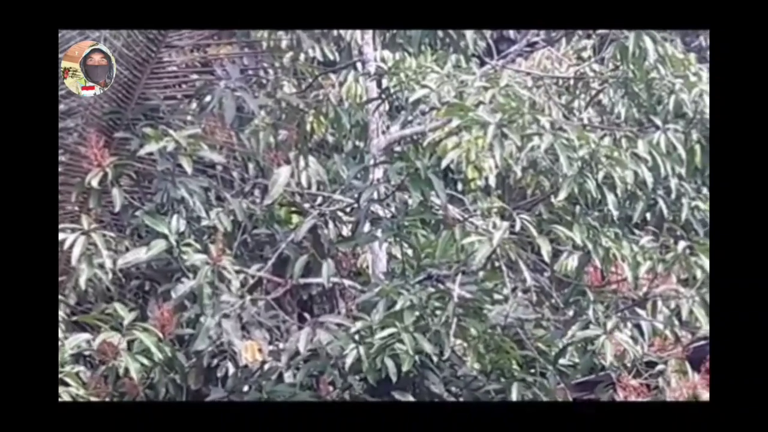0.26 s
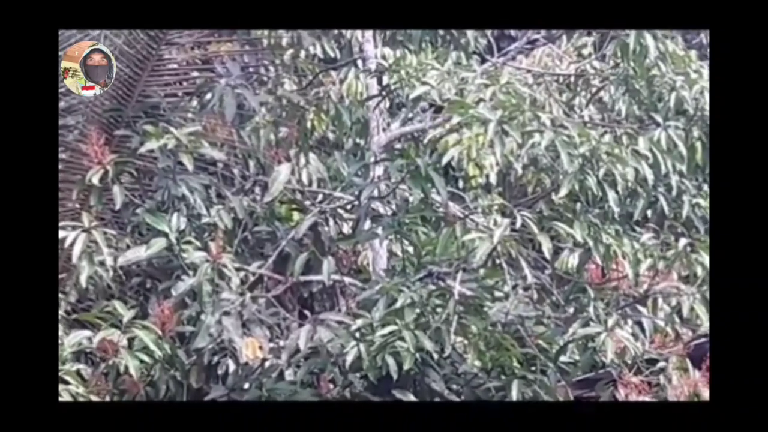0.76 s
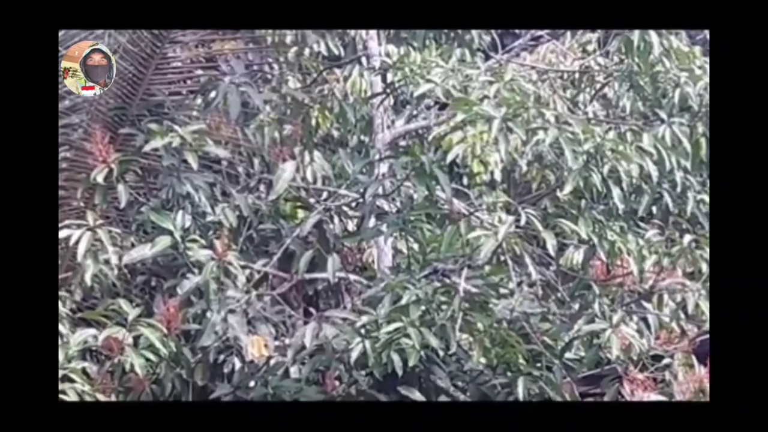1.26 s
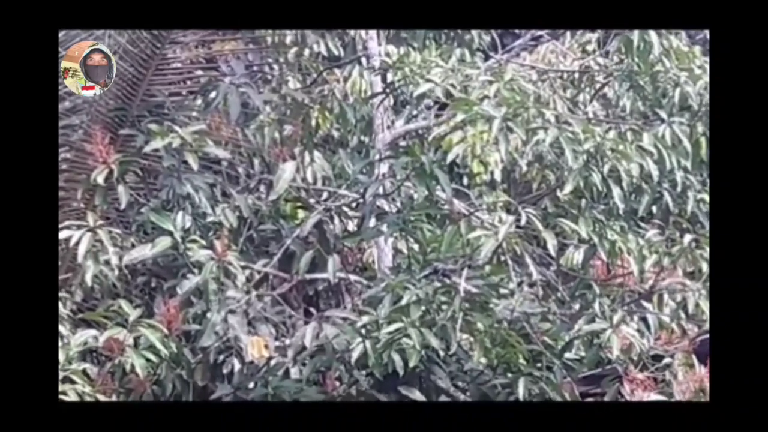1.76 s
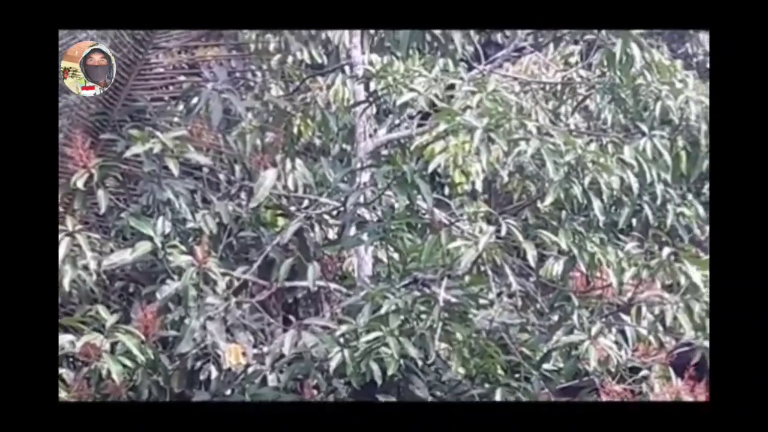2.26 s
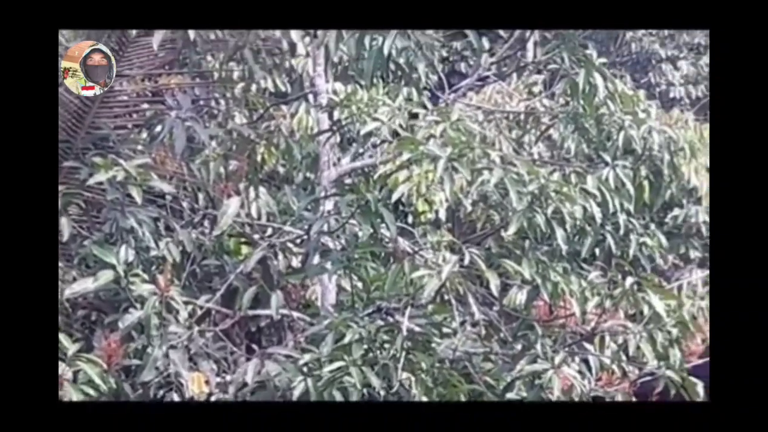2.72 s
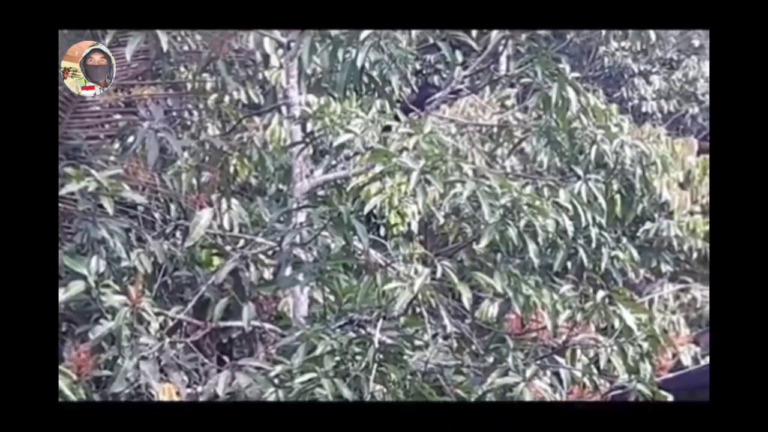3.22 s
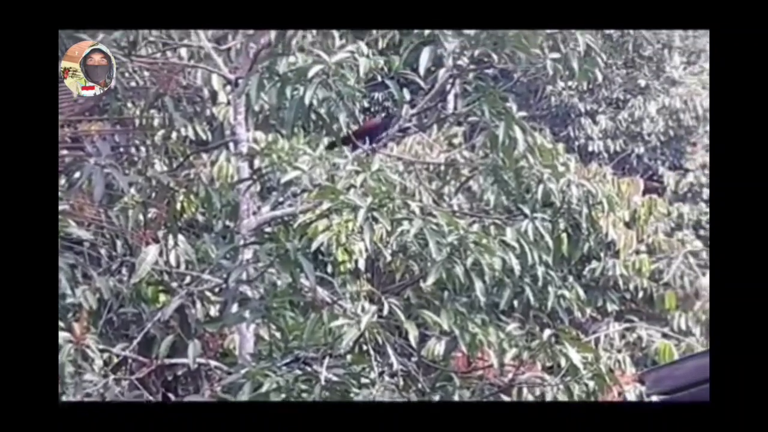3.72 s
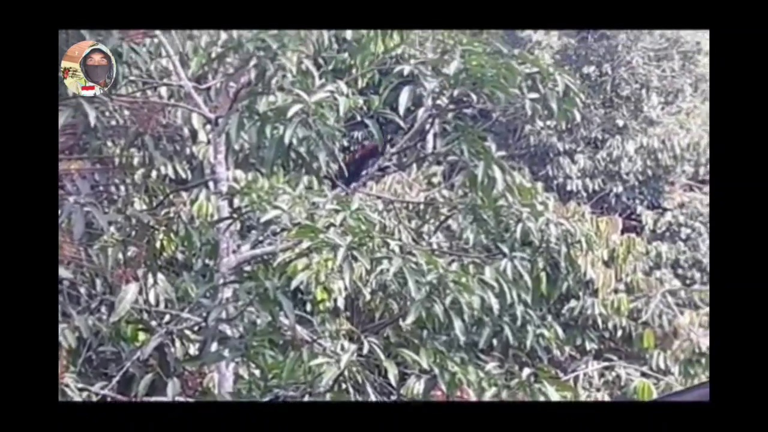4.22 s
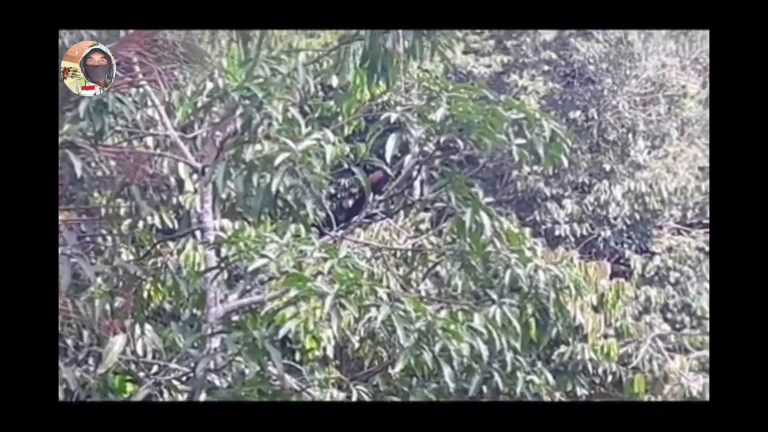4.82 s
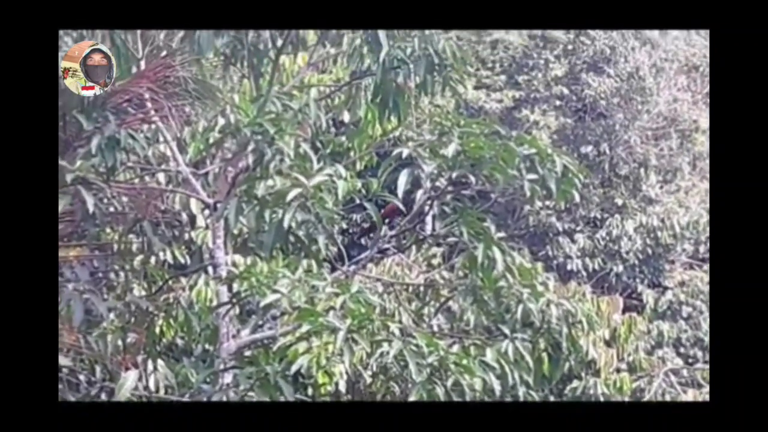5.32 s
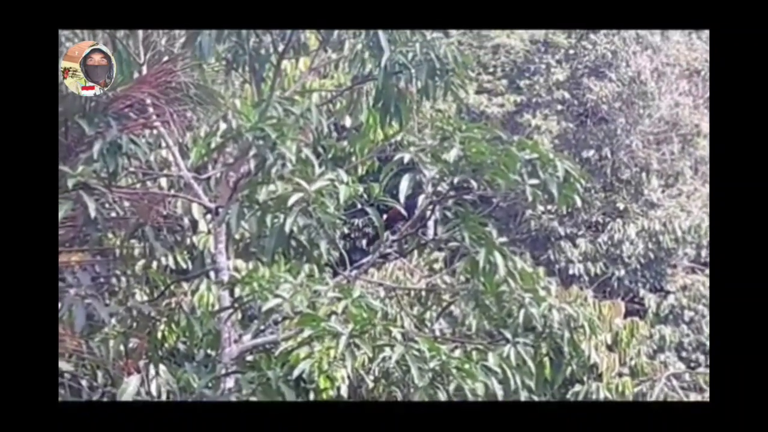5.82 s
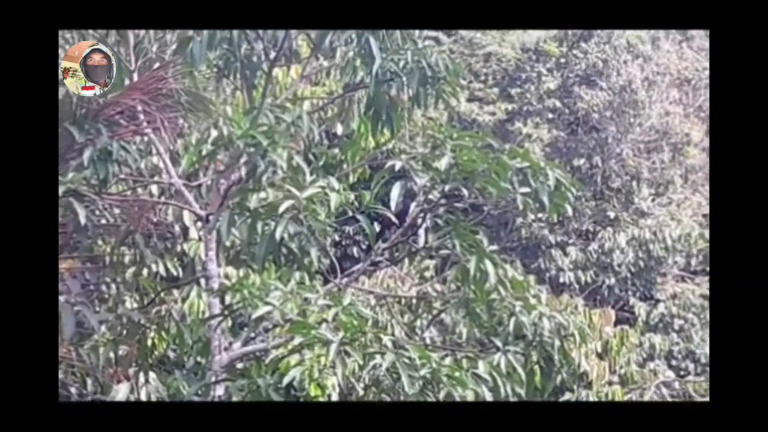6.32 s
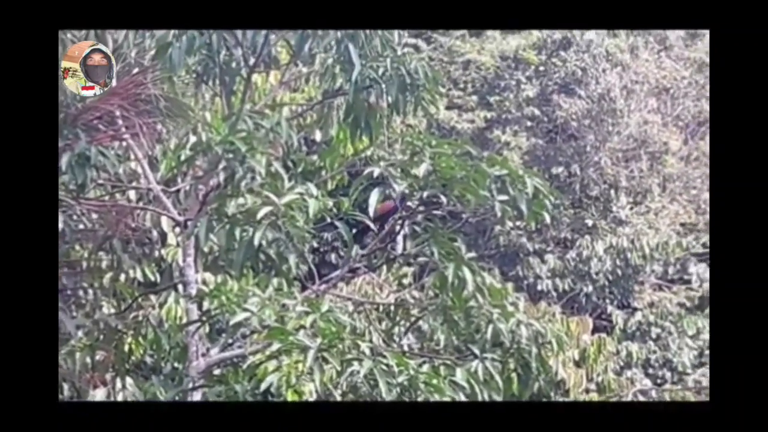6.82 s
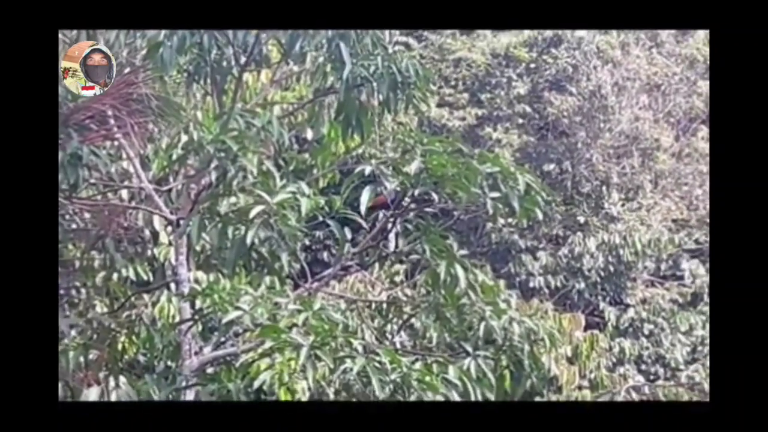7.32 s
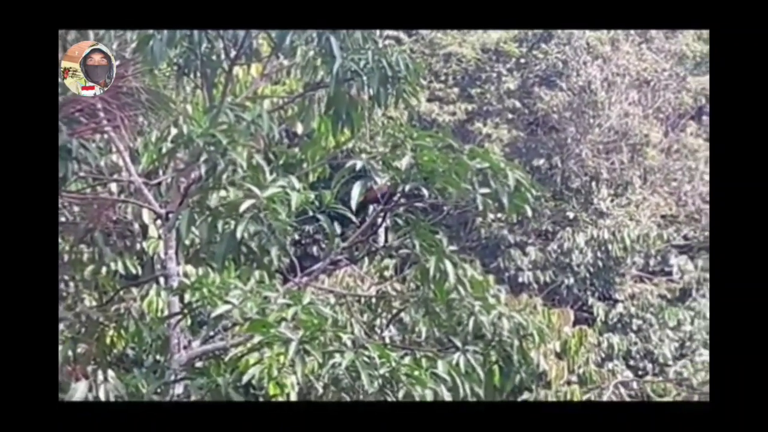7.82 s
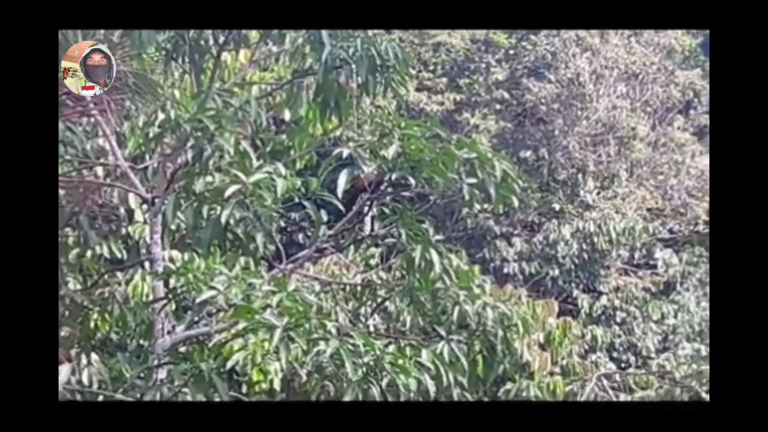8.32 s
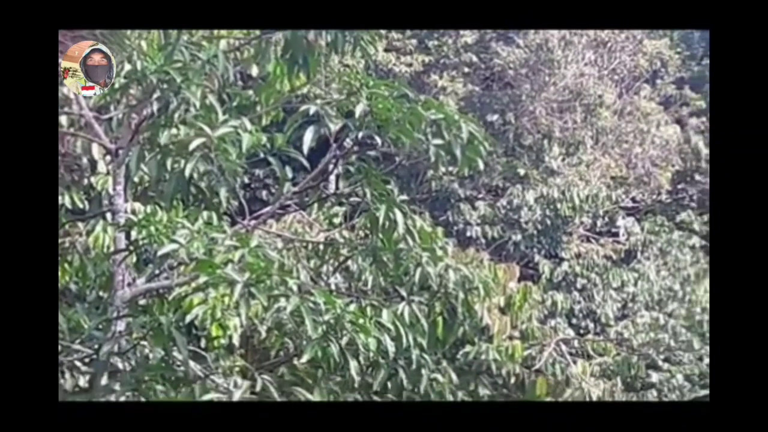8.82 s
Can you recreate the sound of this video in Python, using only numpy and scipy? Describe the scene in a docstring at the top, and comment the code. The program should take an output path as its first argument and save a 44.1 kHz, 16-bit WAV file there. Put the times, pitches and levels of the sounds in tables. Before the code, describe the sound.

A steady high insect trill among trees, with occasional falling bird chirps, soft far birdsong, a light breeze, a click and a thump.

```python
"""Insects and birds in a wooded yard

Insects rub their wings in a steady trill near 7.7 kHz while a bird gives four falling chirps.
Farther birds purr, twitter, rasp and whistle, their calls scattered by the foliage, over the hum
of a distant motor and the eddies of a light breeze. A hand bumps the microphone ports,
hardest on the left, and makes one tick by the right one."""
import sys
import numpy as np
from scipy import signal
from scipy.fft import rfft, irfft, next_fast_len
from scipy.io import wavfile
from scipy.ndimage import uniform_filter1d

SR = 44100
rng = np.random.default_rng(int(sys.argv[2]) if len(sys.argv) > 2 else 0)


def put_to_file(sound):
    """Save the sound as 16-bit audio at rate SR, in the file named by the first command-line argument."""
    columns = np.atleast_2d(sound).T  # one column per channel
    safe = np.clip(columns, -1, 1)
    whole_steps = np.round(safe * 32767)
    wavfile.write(sys.argv[1], SR, whole_steps.astype(np.int16))


N = 399546

# resonance of the insects' wings: (frequency [Hz], gain [dB])
WING_RESONANCE = [(6200, -31), (6750, -20.5), (7100, -8), (7450, -1), (7750, 1), (8050, 0.5), (8400, -7),
                  (8800, -20.5), (9600, -31)]
# falling chirps: (start [s], dive length [s], held ending [s], lead-in pitch [Hz], crest pitch [Hz],
# end pitch [Hz], relative level [dB], accent on the ending [dB])
FALLING_CHIRPS = [(1.326, 0.072, .03, 6700, 4850, 3380, -40.5, -5),
                  (2.586, 0.076, .012, 5600, 4250, 3450, -45, 1),
                  (6.349, 0.074, .07, 6400, 4800, 3270, -42.3, -1.5),
                  (8.052, 0.079, .008, 6700, 4550, 3325, -46, 6)]
# contour of a dive: (time [share of its length], height [0 = end pitch, 1 = crest], gain [dB])
DIVE_CONTOUR = [(0, .5, -12), (.18, .72, -3), (.36, 1, 0), (.52, .4, 0), (.66, .28, -5), (.8, .04, -1),
                (1, 0, -3)]
# purring phrases: (start [s], length [s], pitch [Hz], relative level [dB], scatter [share of pitch])
PURR_PHRASES = [(0.227, 0.28, 2168, -58.5, 0.094), (0.682, 0.2, 2060, -57, 0.101),
                (1.167, 0.18, 2160, -55, 0.12), (1.755, 0.44, 2124, -57.5, 0.061),
                (2.195, 0.19, 2013, -60.5, 0.066), (2.671, 0.48, 2135, -57.5, 0.076),
                (3.402, 0.32, 2087, -57.5, 0.062), (3.856, 0.36, 2160, -59, 0.08),
                (4.43, 0.46, 2172, -56.5, 0.049), (4.997, 0.45, 2073, -68.5, 0.097),
                (5.558, 0.41, 2074, -60, 0.0983), (6.077, 0.44, 2180, -56, 0.042),
                (6.715, 0.47, 1930, -59, .11), (7.123, 0.45, 2200, -64.5, 0.063),
                (7.821, 0.25, 2020, -59, 0.086), (8.723, 0.28, 2455, -65, 0.036)]
# the two bands of a purr: (frequency [multiple of pitch], gain [dB])
PURR_BANDS = [(1, 0), (2.13, -8)]
# breath noise around a purr: (frequency [multiple of pitch], gain [dB])
BREATH_SPECTRUM = [(.65, -19), (.82, -14), (1, 14), (1.13, -9), (1.35, -17)]
# whistled and cooed notes: (start [s], length [s], start pitch [Hz], end pitch [Hz], relative level [dB])
WHISTLED_NOTES = [(1.545, 0.023, 2410, 1750, -55), (3.613, 0.075, 389, 447, -61),
                  (6.025, 0.16, 2620, 2830, -63.5), (6.762, 0.033, 4250, 4185, -63)]
# partials of the reedy call: (frequency [Hz], relative level [dB])
REEDY_PARTIALS = [(1800, -67), (2600, -70), (3120, -60.5), (3700, -64.5), (3980, -64)]
# dry rasps: (start [s], length [s], relative level [dB])
RASP_CALLS = [(1.129, 0.014, -55), (1.583, 0.081, -61.5), (4.68, 0.034, -56.5), (4.95, 0.035, -60.5),
              (5.006, 0.059, -57), (5.108, 0.046, -55.5), (6.748, 0.053, -58), (6.834, 0.037, -55.5),
              (6.929, 0.041, -57.5)]
# thin twitter of the farthest birds: (start [s], length [s], pitch [Hz], relative level [dB])
TWITTER_PHRASES = [(0.049, 1.7, 3095, -69.5), (0.248, 0.58, 4570, -65.5), (0.303, 1.3, 5000, -67),
                   (2.301, 0.54, 4930, -65), (2.858, 0.22, 4940, -63), (4.097, 0.4, 5060, -67.5),
                   (4.15, .6, 4560, -68), (5.402, 0.42, 5020, -68), (5.648, 0.96, 4590, -66),
                   (5.62, 0.42, 3070, -69), (8.704, 0.61, 4850, -66)]
# purring birds too far off to tell apart: (frequency [Hz], gain [dB])
FAR_PURR_SPECTRUM = [(1500, -9), (1850, -12.5), (2150, 4), (2400, -11), (2750, -31)]
# bumps on the ports: (time [s], peak before capping [dB], pitch [factor], left minus right [dB])
PORT_BUMPS = [(3.949, -34.5, 0.44, -18), (4.1607, -36.5, 0.48, -21), (8.4345, 1, 0.91, 60),
              (8.914, -23, 0.44, 40), (8.9413, -31, 0.68, 42)]
# spectrum of a bump at pitch factor 1: (frequency [Hz], gain [dB])
BUMP_SPECTRUM = [(30, -78), (85, -17.5), (160, -3.5), (240, 1), (400, 1), (680, -4), (1000, -6),
                 (1900, -20), (2800, -28.5), (5000, -54), (9000, -68)]
# tick by the right port: (level [dB], ring frequency [Hz], damping [1/s])
PORT_TICK = (-9.5, 10800, 16000)
# the breeze drops, picks up once and dies away: (time [s], level [dB])
BREEZE_LEVELS = [(0, -60.5), (.6, -57.5), (1.7, -67), (3.4, -64), (3.9, -59), (5.0, -61), (5.8, -64),
                 (7.3, -74.5), (9.06, -72)]
# low buffets of wind: (start [s], length [s], level [dB], left minus right [dB])
WIND_BUFFETS = [(0.44, 0.1, -52.5, 12), (0.966, 0.072, -65, -17), (2.815, 0.11, -57.5, -20),
                (4.187, 0.052, -51, 15), (4.814, 0.084, -61, 11), (5.409, 0.05, -53, -14)]
# outdoor air: (frequency [Hz], gain [dB])
AIR_SPECTRUM = [(25, -33), (70, -7), (140, -6.5), (195, 1.5), (290, -8), (400, -6), (540, -8.5), (760, -3),
                (1100, -10.5), (1750, -9.5), (2600, -11.5), (4800, -15), (5900, -18), (13000, -22),
                (15500, -15.5)]
# tones of the distant motor: (frequency [Hz], base level [dB])
MOTOR_TONES = [(179, -73), (339, -68), (834, -75)]
# the motor's lowest tone eases off: (time [s], gain [dB])
DRONE_GAIN = [(0, 17.3), (.5, 11.6), (.9, 7.1), (9.06, 3.4)]


def insect_chorus(chorus_db=-47.5):
    """Resonance: a blurred crowd and one near trill excite the same wing band and a weak octave above."""
    strokes = rng.standard_normal((2, N)) + undb(-10) * wing_strokes()
    wings = level(colour(strokes, WING_RESONANCE))
    octave = level(colour(strokes, [(13200, -19), (14500, -22), (15400, -14), (16500, -12)]))
    left_db = curve([(1.5, -3.0), (7.0, -5.8)])  # the band slides right as the microphone turns
    waver_db = .48 * walk(12) + .45 * walk(3)
    return undb(chorus_db + waver_db) * (wings * pan(left_db) + undb(-15) * octave * pan(left_db=.5))


def wing_strokes(stroke_hz=24.38, decay_share=.077):
    """Stridulation: each stroke drags across a file of teeth, giving a decaying burst of noise."""
    phase = np.cumsum(stroke_hz * (1 + .005 * walk(3))) / SR % 1
    return level(np.exp(-phase / decay_share) * rng.standard_normal((2, N)))


def chirping_bird(lead_ahead_s=.058, wall_delay_s=.00714, wall_db=-13):
    """Reflection: each chirp, a thin falling lead-in and then a dive, echoes off a nearby wall."""
    out = np.zeros(N)
    for start, dive_s, hold_s, lead_hz, crest_hz, end_hz, db, accent_db in FALLING_CHIRPS:
        u = progress(.075)
        lead_in = tone(lead_hz * (1 - .24 * u + .07 * walk(1600, len(u))))
        add(out, start - lead_ahead_s, level(lead_in * swell(u), db - 18))
        add(out, start, dive(dive_s, hold_s, crest_hz, end_hz, accent_db) * undb(db + 3))
    echoed = out.copy()
    add(echoed, wall_delay_s, undb(wall_db) * out)
    scattered = foliage(echoed, direct_db=-5.5, leaves_t60=.047, trees_db=-3, trees_t60=.36)
    return scattered * pan(left_db=-2.5)


def dive(dive_s, hold_s, crest_hz, end_hz, accent_db, flutter_hz=145, fade_db_per_s=140):
    """Frequency modulation: fast flutter roughens a note that arches, then falls to a clearer ending."""
    t = np.arange(int((dive_s + hold_s) * SR)) / SR
    u = np.minimum(t / dive_s, 1)
    shares, heights, contour_db = np.transpose(DIVE_CONTOUR)
    height = np.interp(u, shares, heights)
    harshness = np.clip(4 * height, 0, 1)
    flutter = .07 * tone(flutter_hz * (1 + .15 * walk(200, len(u)))) + .04 * walk(1200, len(u))
    hz = (end_hz + (crest_hz - end_hz) * height) * (1 + np.maximum(harshness, .42) * flutter)
    voice = tone(hz) + undb(-17.5) * tone(2 * hz) + undb(-25) * tone(3 * hz)
    fade_db = fade_db_per_s * np.maximum(t - dive_s, 0)
    voice_db = np.interp(u, shares, contour_db) + accent_db * (1 - harshness) - fade_db
    rasp_spectrum = [(1500, -12), (2400, 0), (3800, -1), (4900, 2), (5700, -4), (9500, -18), (13500, -5)]
    rasp = level(colour(rng.standard_normal(len(u)), rasp_spectrum), -11)
    return (voice * undb(voice_db) + rasp * swell(u)) * signal.windows.tukey(len(u), .1)


def purring_bird(arch_share=.035, wander_share=.012):
    """Amplitude modulation: two hoarse bands pulse in rolled, arching phrases, with breath noise."""
    out = np.zeros(N)
    for start, length, hz, db, scatter in PURR_PHRASES:
        u = progress(length)
        envelope = swell(u)
        pitch = hz * (1 + arch_share * (envelope - envelope.mean()) + wander_share * walk(45, len(u)))
        for multiple, band_db in PURR_BANDS:
            band = trill(pitch * multiple, scatter / multiple, pulse_hz=47.95, sweep=.049)
            add(out, start, level(band * np.sqrt(envelope), db + band_db))
        spectrum = [(hz * multiple, gain_db) for multiple, gain_db in BREATH_SPECTRUM]
        breath = colour(rng.standard_normal(len(u)), spectrum)
        add(out, start, level(breath * envelope, db - 3.5))
    scattered = foliage(out, direct_db=0, leaves_t60=.12, trees_db=-2, trees_t60=1.2)
    return scattered * undb(-2) * pan(left_db=-3.5)


def trill(hz, scatter, pulse_hz, sweep):
    """Pulse modulation: uneven pulses each slide down; scatter and sweep are shares of the pitch."""
    size = len(hz)
    phase = np.cumsum(pulse_hz * (1 + .208 * walk(20, size))) / SR % 1
    pitch = hz * (1 + sweep * (.5 - phase) + scatter * walk(260, size))
    return tone(pitch) * np.sin(np.pi * phase) * undb(1.6 * walk(41.1, size))


def whistles_and_reedy_call(reedy_start_s=8.32, reedy_length_s=.095, roughness_db=3.5):
    """Jitter and shimmer: gliding whistles waver in pitch, a reedy call's partials in level as well."""
    out = np.zeros(N)
    for start, length, from_hz, to_hz, db in WHISTLED_NOTES:
        u = progress(length)
        glide_hz = from_hz + (to_hz - from_hz) * np.sin(np.pi / 2 * u)
        whistle = tone(glide_hz * (1 + .013 * walk(300, len(u))))
        add(out, start, level(whistle * swell(u) * undb(-5 * u), db))
    u = progress(reedy_length_s)
    for hz, db in REEDY_PARTIALS:
        partial = tone(hz * (1 + .017 * walk(500, len(u))))
        shimmer = undb(roughness_db * walk(205, len(u)))
        add(out, reedy_start_s, level(partial * swell(u) * shimmer, db))
    return foliage(out, direct_db=1, leaves_t60=.081, trees_db=-16, trees_t60=.34) * pan(left_db=-4.5)


def rasping_birds():
    """Aperiodic sound: dry bursts of noise from deeper in the trees, their edges blurred by leaves."""
    out = np.zeros(N)
    spectrum = [(1200, 1), (2400, -13), (3100, -.5), (4100, -1.5), (4800, -5), (5600, -8)]
    for start, length, db in RASP_CALLS:
        u = progress(length)
        rasp = colour(rng.standard_normal(len(u)), spectrum)
        add(out, start, level(rasp * np.sin(np.pi * u), db))
    return foliage(out, direct_db=-4, leaves_t60=.06, trees_db=-8, trees_t60=.45) * pan(left_db=-4.5)


def twittering_birds(syllables_per_s=18):
    """Diffuse sound: thin trills, wavering in syllables, arrive mostly by way of the foliage."""
    out = np.zeros(N)
    for start, length, hz, db in TWITTER_PHRASES:
        u = progress(length)
        pitch = hz * (1 + .012 * walk(syllables_per_s, len(u)))
        syllables = undb(2 * walk(syllables_per_s, len(u)))
        voice = trill(pitch, scatter=.045, pulse_hz=70.5, sweep=.053)
        add(out, start, level(voice * syllables * swell(u), db))
    return foliage(out, direct_db=-7.5, leaves_t60=.12, trees_db=-11.5, trees_t60=.9) * pan(left_db=-5)


def far_purring_birds():
    """Incoherent summation: many distant purrs merge into one soft, slowly swelling band of noise."""
    band = colour(rng.standard_normal((2, N)), FAR_PURR_SPECTRUM)
    return level(band * undb(.68 * walk(3.7)), -68.5) * pan(left_db=1.5)


def hand_on_ports(cap_db=-.2, tick_time_s=5.9134):
    """Impulse excitation: soft pushes thud on one port or the other; a hard tick rings by the right."""
    out = np.zeros((2, N))
    for start, db, pitch, left_db in PORT_BUMPS:
        sides = pan(left_db) / pan(left_db).max()
        add(out, start, -undb(min(db, cap_db)) * thud(pitch) * sides)
    db, ring_hz, damping = PORT_TICK
    t = np.arange(SR // 100) / SR
    decay = np.exp(-damping * t) + .08 * np.exp(-t / .0006)
    add(out[1], tick_time_s, undb(db) * np.cos(2 * np.pi * ring_hz * t) * decay)
    return out


def thud(pitch, size=4096):
    """Minimum-phase response: one heavily damped swing with the spectrum of a bump and a peak of 1."""
    hz, db = np.transpose(BUMP_SPECTRUM)
    gain = undb(np.interp(log_frequencies(size), np.log(hz * pitch), db))
    cepstrum = irfft(np.log(gain))
    log_spectrum = rfft(2 * cepstrum[:size // 2], size)  # a one-sided cepstrum makes the swing causal
    swing = irfft(np.exp(log_spectrum))
    return swing / np.abs(swing).max()


def breeze(gusts_per_s=6.4, gust_db=2):
    """Turbulence: eddies rumble and gust on each port by itself, now and then with a firmer buffet."""
    pressure = rng.standard_normal((2, N)) + .39 * rng.standard_normal(N)
    eddies = level(colour(pressure, [(15, -19), (45, -3.5), (75, -1), (120, -2), (250, -26), (600, -66)]))
    gusts = gust_db * np.array([walk(gusts_per_s), walk(gusts_per_s)])
    strength = undb(curve(BREEZE_LEVELS) + gusts) * pan(left_db=-3.5)
    for start, length, db, left_db in WIND_BUFFETS:
        add(strength, start, undb(db) * np.sin(np.pi * progress(length)) * pan(left_db))
    return eddies * strength


def distant_motor():
    """Tonal machine noise: three wavering tones hum, and the lowest eases off."""
    drone, *whine = (level(tone(hz * (1 + .00592 * walk(15))) * undb(2 * walk(6)), db)
                     for hz, db in MOTOR_TONES)
    return (undb(curve(DRONE_GAIN)) * drone + sum(whine)) * pan(left_db=-3)


def outdoor_air():
    """Spatial coherence: long waves of ambient noise reach both ports much alike; short ones differ."""
    separate = colour(rng.standard_normal((2, N)), AIR_SPECTRUM)
    shared = colour(rng.standard_normal(N), AIR_SPECTRUM)
    highs = butter(separate, 500, "high", order=1)
    lows = .77 * butter(separate, 430, "low", order=1) + 1.39 * butter(shared, 464, "low", order=2)
    return level(highs + lows, -53.5) * undb(.5 * walk(3.34)) * pan(left_db=-3)


def foliage(x, direct_db, leaves_t60, trees_db, trees_t60):
    """Scattering: a direct path, quick echoes from leaves and a longer tail from trees (t60 in s)."""
    t = np.arange(SR) / SR
    leaves, trees = (level(rng.standard_normal((2, SR)) * np.exp(-np.log(1000) * t / t60))
                     for t60 in (leaves_t60, trees_t60))
    response = (leaves + undb(trees_db) * trees) / np.sqrt(SR)
    response[:, 0] += undb(direct_db)
    response /= np.sqrt(np.sum(response ** 2) / 2)
    return signal.fftconvolve(x[None], response, axes=1)[:, :N]


def undb(db):
    """Amplitude ratio of a level in decibels."""
    return 10 ** (np.asarray(db) / 20)


def level(x, db=0):
    """Normalisation to an rms level."""
    return x * undb(db) / np.sqrt(np.mean(x ** 2))


def pan(left_db):
    """Level difference: the two channel gains for a left-minus-right level or curve."""
    return undb(np.array([[.5], [-.5]]) * left_db)


def curve(points):
    """Linear interpolation of (time [s], value) points over the scene."""
    return np.interp(np.arange(N) / SR, *np.transpose(points))


def walk(rate, size=N):
    """Smooth random fluctuation with a spread near 1, changing `rate` times a second."""
    step = int(SR / rate)
    steps = np.repeat(rng.standard_normal(size // step + 1), step)
    return 1.2 * uniform_filter1d(steps, step)[:size]


def log_frequencies(size):
    """Logarithmic frequency axis of a transform, offset by 1 Hz to stay finite."""
    return np.log(np.arange(size // 2 + 1) * SR / size + 1)


def colour(x, points):
    """Spectral shaping by (frequency [Hz], gain [dB]) points."""
    hz, db = np.transpose(points)
    size = next_fast_len(x.shape[-1])
    gain = undb(np.interp(log_frequencies(size), np.log(hz), db, left=-90, right=-90))
    return irfft(rfft(x, size) * gain, size)[..., :x.shape[-1]]


def butter(x, hz, kind, order):
    """Causal filtering with a maximally flat passband."""
    return signal.sosfilt(signal.butter(order, hz, kind, fs=SR, output="sos"), x)


def add(track, start, sound):
    """Superposition of a sound on a track from `start` seconds."""
    i = int(start * SR)
    track[..., i:i + sound.shape[-1]] += sound[..., :max(N - i, 0)]


def progress(length):
    """Normalised time, 0 to 1 over `length` seconds."""
    return np.linspace(0, 1, int(length * SR))


def tone(hz):
    """A sine whose phase is the integral of a frequency curve."""
    return np.sin(2 * np.pi * np.cumsum(hz) / SR)


def swell(u):
    """Amplitude envelope with a soft start and end."""
    return np.sqrt(np.abs(np.sin(np.pi * u)))


def scene():
    """Superposition: the pressures of all sources in the yard add."""
    animals = insect_chorus() + chirping_bird() + purring_bird() + far_purring_birds()
    animals += twittering_birds() + rasping_birds() + whistles_and_reedy_call()
    return animals + outdoor_air() + distant_motor() + breeze() + hand_on_ports()


def record(dry):
    """Band limiting: a steep low-pass filter cuts the treble above 15.6 kHz."""
    return signal.sosfilt(signal.ellip(10, .2, 70, 15600, fs=SR, output="sos"), dry)


dry = scene()
out = record(dry)
put_to_file(out)
```